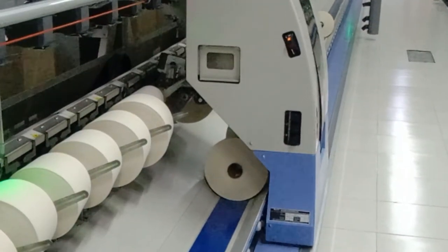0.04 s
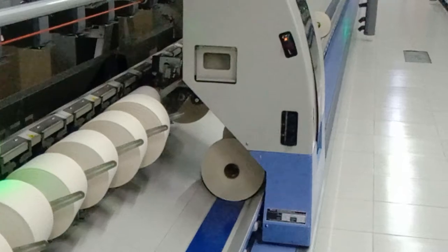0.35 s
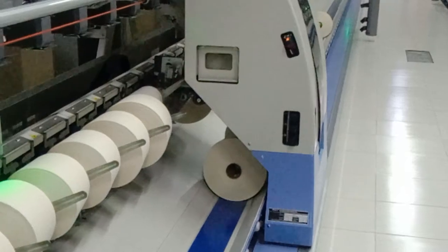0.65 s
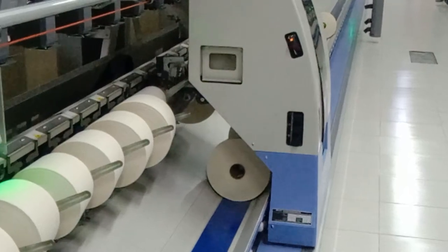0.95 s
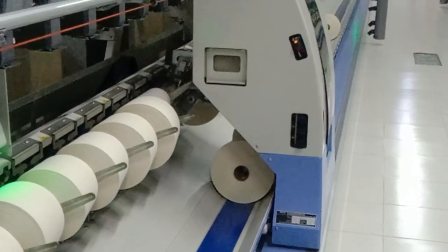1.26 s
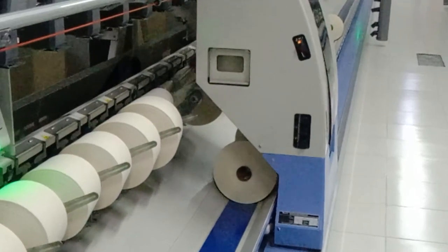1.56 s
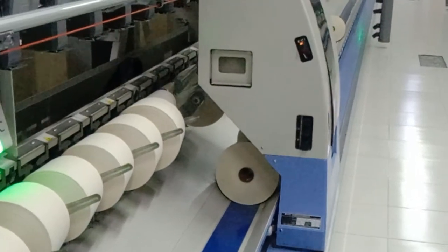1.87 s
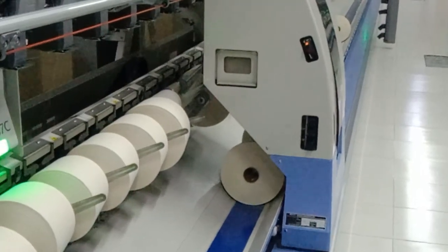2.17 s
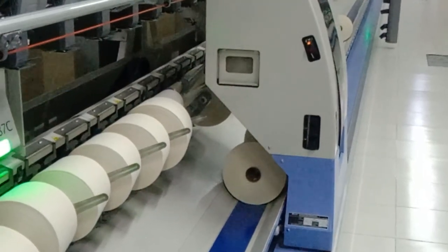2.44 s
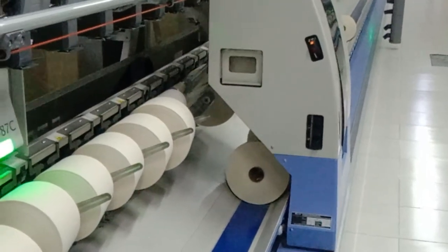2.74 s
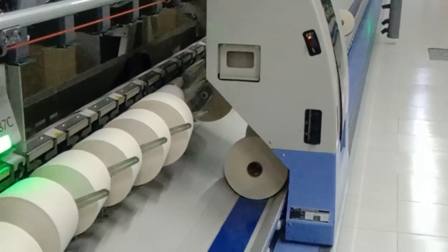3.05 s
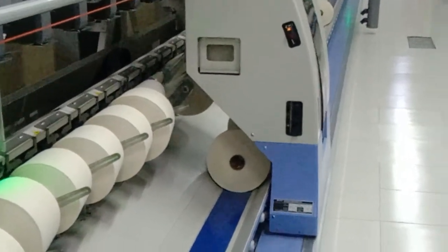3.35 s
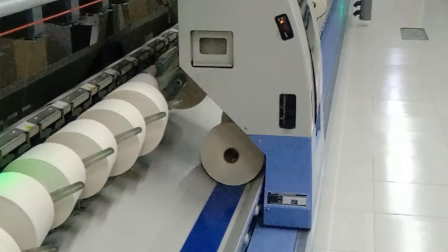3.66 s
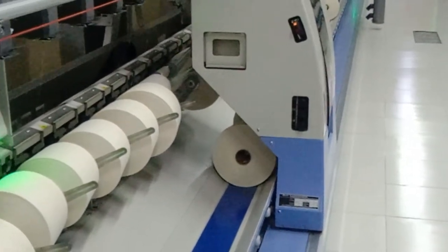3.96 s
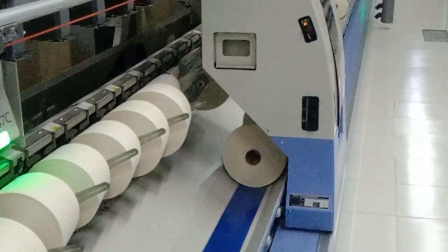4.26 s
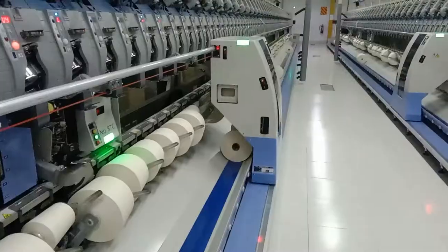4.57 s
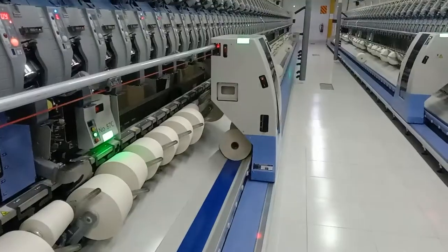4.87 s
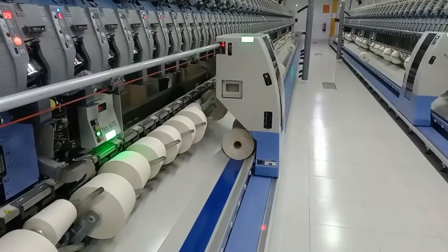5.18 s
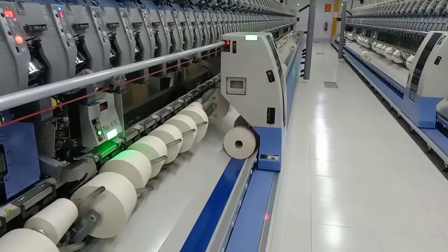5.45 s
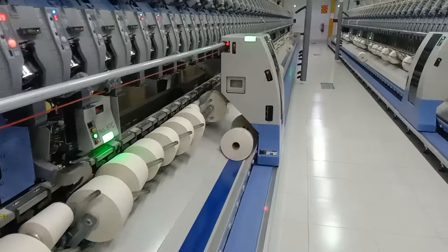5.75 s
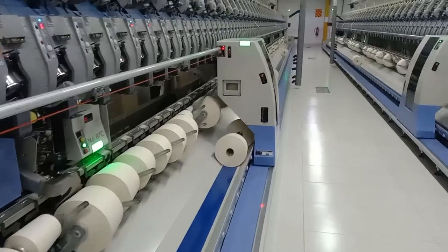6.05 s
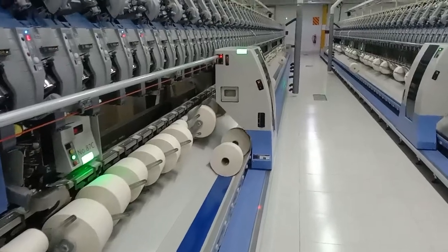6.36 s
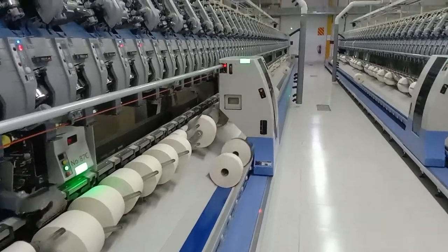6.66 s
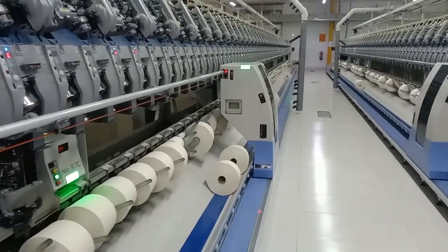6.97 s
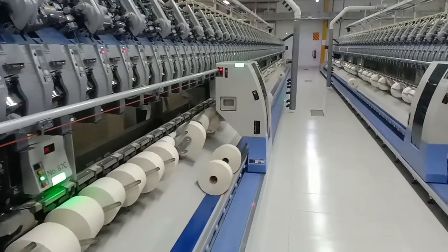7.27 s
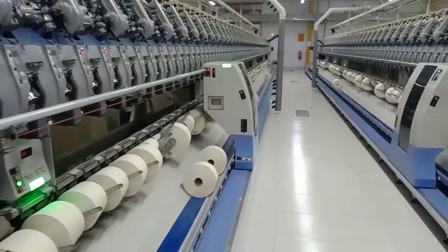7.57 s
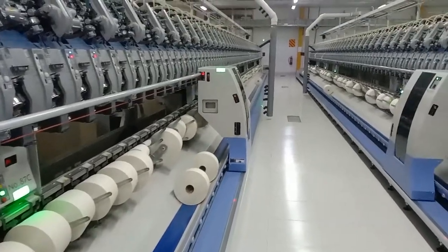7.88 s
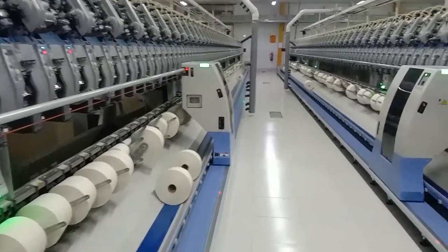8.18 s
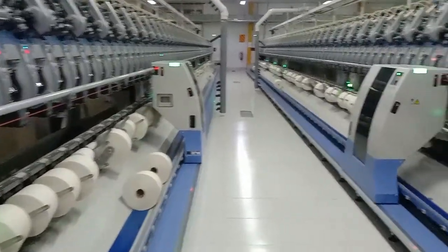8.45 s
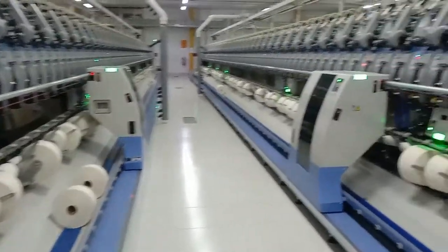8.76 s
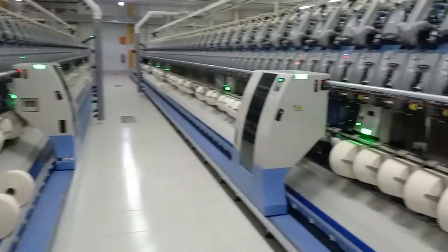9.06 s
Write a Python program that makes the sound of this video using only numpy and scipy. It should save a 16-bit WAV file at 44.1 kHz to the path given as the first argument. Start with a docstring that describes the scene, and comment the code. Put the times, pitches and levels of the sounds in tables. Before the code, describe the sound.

A dense, high-pitched whirring from many spinning machine rotors fills a big factory hall from start to finish. A thin electrical whine and a fluttering air hiss sit on top, with a few brief breathy whistles, while rushing suction and wavering motor hum fill in below. The microphone moves slowly along the aisle, so a low rumble grows slightly midway, then a gearbox hum and a nearby rotor stand out in turn.

```python
"""Spinning hall, in the aisle between rows of steadily running rotor spinning machines.
Hundreds of rotor bearings sing together near 6 kHz. Air hisses and whistles at the nearest yarn
nozzles, and a thread adds a thin whistle. Behind them: roar of suction air, ringing housings,
hum of the drives. Single sources swell and fade as the listener drifts along the row."""
import sys
import numpy as np
from scipy import signal
from scipy.fft import rfft, irfft, next_fast_len
from scipy.io import wavfile
from scipy.ndimage import map_coordinates

SR = 44100
rng = np.random.default_rng(int(sys.argv[2]) if len(sys.argv) > 2 else 0)


def log_audio(samples):
    """Write samples as a 16-bit WAV file to the path given in sys.argv[1]."""
    # one column per channel
    frames = np.atleast_2d(samples).T
    # limit to full scale, then quantise
    limited = np.clip(frames, -1, 1)
    pcm = np.round(limited * 32767).astype(np.int16)
    wavfile.write(sys.argv[1], SR, pcm)


N = 411012
TIME_S = np.arange(N) / SR
FFT_SIZE = next_fast_len(N)
FREQ_HZ = np.fft.rfftfreq(FFT_SIZE, 1 / SR)

# rotor and bearing resonances: (frequency [Hz], width [Hz], peak density [dB/Hz])
ROTOR_MODES = [(4914, 306, -54), (5395, 180, -48), (5600, 210, -47.5), (5796, 236, -44.5),
               (6174, 292, -45.5), (6694, 330, -56), (7120, 440, -64.5)]
# pitch clusters of single rotors: (centre [Hz], spread [Hz], cluster level [dB])
ROTOR_CLUSTERS = [(5400, 70, -29.5), (5850, 70, -27.5), (6130, 75, -29.5)]
# rotor chorus along the row, used about its mean: (time [s], level [dB])
CHORUS_CURVE = [(0, -14.2), (1.4, -13.8), (3.1, -14), (4.2, -15), (5.3, -14.5), (6.5, -14.9), (7.4, -14.8),
                (8.3, -14.5), (9.32, -14.5)]
# air drawn into the nearest nozzles: (frequency [Hz], density [dB/Hz])
INTAKE_SPECTRUM = [(4000, -97), (7900, -72), (8500, -82), (9600, -68), (10300, -66.5), (10900, -64.5),
                   (11400, -69.5), (12100, -67.5), (13400, -84), (15400, -82)]
# finest air spray, beamed out of the nozzles: (frequency [Hz], density [dB/Hz])
SPRAY_SPECTRUM = [(5000, -93), (8000, -76), (11000, -76), (12200, -69.5), (13400, -74.5), (15400, -70.5)]
# how openly the nozzles face the listener, used about its mean: (time [s], level [dB])
FACING_CURVE = [(0, -40.5), (1.3, -42.5), (3.0, -40.9), (3.6, -39.2), (4.7, -38.7), (8.2, -38), (9.32, -40)]
# single nozzle whistles: (start [s], length [s], frequency [Hz], width [Hz], level [dB])
NOZZLE_WHISTLES = [(-.3, 1.2, 12280, 240, -37), (2.05, 1.8, 11960, 200, -40), (3.25, .65, 12350, 400, -39),
                   (8.55, 0.57, 12270, 260, -35.5)]
# suction air and belts, blended by the hall: (frequency [Hz], density [dB/Hz])
ROAR_SPECTRUM = [(25, -93), (48, -85), (80, -74), (122, -61), (195, -64), (250, -63), (450, -65.5),
                 (720, -65), (930, -62), (1250, -58.5), (1800, -60.5), (2900, -66), (4000, -72),
                 (8000, -80), (16000, -95)]
# rotor housing and cover resonances: (frequency [Hz], width [Hz], peak density [dB/Hz])
HOUSING_MODES = [(1960, 92, -62), (2273, 164, -59), (2737, 105, -58), (3286, 307, -57), (3750, 180, -61),
                 (4220, 140, -63), (4503, 294, -58.5)]
# motors, fans and gears: (frequency [Hz], level [dB], waver rate [Hz])
DRIVE_HUMS = [(80, -68, 2), (100.2, -71, 1.5), (150, -54, 1.5), (329.5, -49, 5.7), (1704, -52, 0.7),
              (1700, -55, .6), (1904, -53, .6), (2600, -54, .6), (3604, -59, 0.65)]
# inverter whine with side tones from the motor field: (frequency [Hz], level [dB])
INVERTER_TONES = [(5436.3, -33), (5512, -51), (10796.7, -54), (10872.3, -44), (10948, -58), (11023.7, -65)]

# aisle zones where a source stands out or falls away: (time [s], half length [s], change [dB])
NEAR_ROTOR_ZONE, YARN_ZONE = (8.7, 1.0, 8), (4.6, 0.4, 4)
RUMBLE_ZONE, COVER_ZONE = (5.5, 1.9, 2), (6.8, 0.66, -2.5)
FAN_ZONE, GEARBOX_ZONE = (1.7, 0.69, -9), (6.8, 0.8, 8.4)
INVERTER_ZONE, FAR_MOTOR_ZONE = (5.4, 1.0, 7.5), (9.4, 0.4, 12)


def rotors(per_cluster=24, line_width_hz=7, near_db=-32.5, near_db_per_db=4):
    """Far rotors merge into a ringing hiss; each near one adds a narrow, unsteady line."""
    line_power = np.zeros(len(FREQ_HZ))
    for hz, spread_hz, db in ROTOR_CLUSTERS:
        pitches_hz = hz + spread_hz * rng.standard_normal(per_cluster)
        power = sum(1 / (1 + ((FREQ_HZ - pitch) / line_width_hz) ** 2) ** 2 for pitch in pitches_hz)
        line_power += gain(db) ** 2 * power / (power.sum() * FREQ_HZ[1])
    chorus_db = curve_db(CHORUS_CURVE)
    chorus = noise(np.sqrt(resonances(ROTOR_MODES) ** 2 + line_power)) * gain(chorus_db)
    nearest = noise_band(hz=5820, width_hz=85)
    return chorus + nearest * gain(near_db + near_db_per_db * chorus_db + zone_db(*NEAR_ROTOR_ZONE))


def nozzles(intake_db_per_db=0.18, spray_db_per_db=1.15, fade_s=0.13):
    """Fluttering air hiss and brief breathy whistles; the lower hiss bends round covers, varying least."""
    facing_db = curve_db(FACING_CURVE)
    intake = noise(spectrum(INTAKE_SPECTRUM)) * gain(intake_db_per_db * facing_db)
    spray = noise(spectrum(SPRAY_SPECTRUM)) * gain(spray_db_per_db * facing_db)
    air = (intake + spray) * gain(0.69 * drift(25))
    for start_s, length_s, hz, width_hz, db in NOZZLE_WHISTLES:
        inside_s = np.minimum(TIME_S - start_s, start_s + length_s - TIME_S)
        air += gain(db) * np.clip(inside_s / fade_s, 0, 1) * noise_band(hz, width_hz)
    return air


def yarn(settled_hz=14925, drop_hz=560, drop_at_s=2.05, settle_s=0.07, base_db=-45):
    """Thin whistle: drops once as the thread tension eases, wanders and trembles with that tension."""
    taut = 0.5 - 0.5 * np.tanh((TIME_S - drop_at_s) / settle_s)
    wander_hz = 22 * drift(1.2)
    tremble_hz = 12 * drift(18)
    hz = settled_hz + drop_hz * taut + wander_hz + tremble_hz
    db = base_db + 1.3 * curve_db(FACING_CURVE) + zone_db(*YARN_ZONE) + drift(1.5)
    return gain(db) * tone(hz, waver_hz=30, echo_share=0.45)


def suction(crossover_hz=125, rumble_db=-1.4):
    """Roar of air and belts; its lumpy bass gathers in one zone of the aisle."""
    bass_share = 1 / (1 + (FREQ_HZ / crossover_hz) ** 6)
    rumble = noise(spectrum(ROAR_SPECTRUM) * np.sqrt(bass_share))
    rumble *= gain(rumble_db + zone_db(*RUMBLE_ZONE) + 2.6 * drift(8))
    roar = noise(spectrum(ROAR_SPECTRUM) * np.sqrt(1 - bass_share)) * gain(0.36 * drift(5.1))
    return rumble + roar


def housings(cover_db=-32.7, fade_db_per_s=0.08):
    """Housings ring, fluttering as the bobbins roll; the nearest cover fades as the listener leaves."""
    ringing = noise(resonances(HOUSING_MODES)) * gain(0.58 * drift(13))
    slow_db = cover_db - fade_db_per_s * TIME_S + zone_db(*COVER_ZONE) + 0.5 * drift(1.2)
    cover = noise_band(hz=2349, width_hz=110) * gain(slow_db + 1.3 * drift(17))
    return ringing + cover


def drives():
    """Wavering hum of motors, fans and gears; a gearbox and a motor of the far row stand out in turn."""
    hum = sum(gain(db) * tone(hz, waver_hz, echo_share=0.73) for hz, db, waver_hz in DRIVE_HUMS)
    gearbox = gain(-53 + zone_db(*GEARBOX_ZONE)) * tone(hz=444, waver_hz=4.5, echo_share=0.19)
    far_motor = gain(-53 + zone_db(*FAR_MOTOR_ZONE)) * tone(hz=1122, waver_hz=2.8, echo_share=0.45)
    return hum + gearbox + far_motor


def inverter(beamed_above_hz=8000):
    """Thin whine; only the upper octave is beamed enough to change along the aisle."""
    beam_db = zone_db(*INVERTER_ZONE)
    return sum(gain(db + beam_db * (hz > beamed_above_hz)) * tone(hz, waver_hz=3.6, echo_share=0.1)
               for hz, db in INVERTER_TONES)


def fans(hz=165.2, beat_hz=0.95, in_step_s=0.57, first_db=-42.5, second_relative_db=-8.5):
    """Two suction fans at nearly the same speed beat slowly."""
    beat = abs(1 + gain(second_relative_db) * np.exp(2j * np.pi * beat_hz * (TIME_S - in_step_s)))
    return gain(first_db + zone_db(*FAN_ZONE)) * beat * tone(hz, waver_hz=10, echo_share=0.27)


def aisle(x, count=6, echo_gain=0.075, sway_s=2.5e-5):
    """Floor and machine fronts reflect the sound; the listener sways, shifting the comb colour."""
    echoes = np.zeros(N)
    for delay_s in rng.uniform(0.003, 0.025, count):
        emitted_s = TIME_S - delay_s - sway_s * drift(0.74)
        echoes += map_coordinates(x, [emitted_s * SR], order=2, mode="mirror")
    return (x + echo_gain * echoes) / np.sqrt(1 + count * echo_gain ** 2)


def tone(hz, waver_hz, echo_share):
    """A tone plus its hall echoes; the sum swells and fades."""
    phase_rad = 2 * np.pi * (np.cumsum(hz * np.ones(N)) / SR + rng.random())
    echoes = drift(waver_hz) * np.cos(phase_rad) + drift(waver_hz) * np.sin(phase_rad)
    return np.sqrt(2 * (1 - echo_share)) * np.cos(phase_rad) + np.sqrt(echo_share) * echoes


def noise(density):
    """Noise of the given amplitude per root Hz."""
    return irfft(rfft(rng.standard_normal(FFT_SIZE)) * density, FFT_SIZE)[:N] * np.sqrt(SR / 2)


def noise_band(hz, width_hz):
    """Noise through one resonance, rms 1."""
    return unit_rms(noise(resonances([(hz, width_hz, 0)])))


def spectrum(points):
    """Amplitude per bin from (frequency [Hz], density [dB/Hz]), joined on a log-frequency axis."""
    hz, db = np.transpose(points)
    return gain(np.interp(np.log(FREQ_HZ + 1), np.log(hz), db))


def resonances(modes):
    """Amplitude per bin of steep-sided resonances; powers add."""
    peaks = (gain(db) / (1 + (np.sqrt(2) - 1) * (2 * (FREQ_HZ - hz) / width_hz) ** 2)
             for hz, width_hz, db in modes)
    return np.sqrt(sum(peak ** 2 for peak in peaks))


def drift(rate_hz, size=4096):
    """Random motion up to about rate_hz, rms 1."""
    hz = np.fft.rfftfreq(size, TIME_S[-1] / size)
    slow = irfft(rfft(rng.standard_normal(size)) * (hz > 0) / (1 + (hz / rate_hz) ** 4))
    return np.interp(TIME_S, np.linspace(0, TIME_S[-1], size), unit_rms(slow))


def curve_db(points):
    """Curve through (time [s], level [dB]), mean removed."""
    db = np.interp(TIME_S, *np.transpose(points))
    return db - db.mean()


def zone_db(centre_s, half_length_s, change_db):
    """Level change while the listener crosses one zone."""
    return change_db / (1 + ((TIME_S - centre_s) / half_length_s) ** 4)


def gain(db):
    return 10 ** (np.asarray(db) / 20)


def unit_rms(x):
    return x / np.sqrt(np.mean(abs(x) ** 2) + 1e-20)


def scene():
    """All machines, the same in both ears."""
    mix = suction() + housings() + aisle(rotors() + nozzles()) + drives() + inverter() + fans() + yarn()
    return np.array([mix, mix])


def record(dry, ceiling=0.75, cutoff_hz=15520):
    """Soft limit on the rare highest peaks, then a steep low-pass."""
    rounded = dry / (1 + (dry / ceiling) ** 8) ** (1 / 8)
    lowpass = signal.firwin(1023, cutoff_hz, window=("kaiser", 9), fs=SR)
    return signal.oaconvolve(rounded, lowpass[None], "same")


dry = scene()
out = record(dry)
log_audio(out)
```